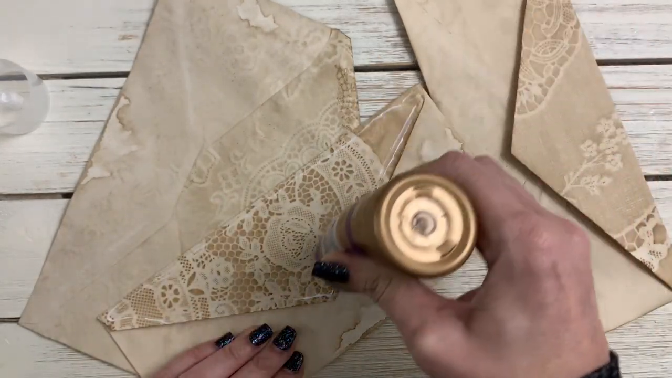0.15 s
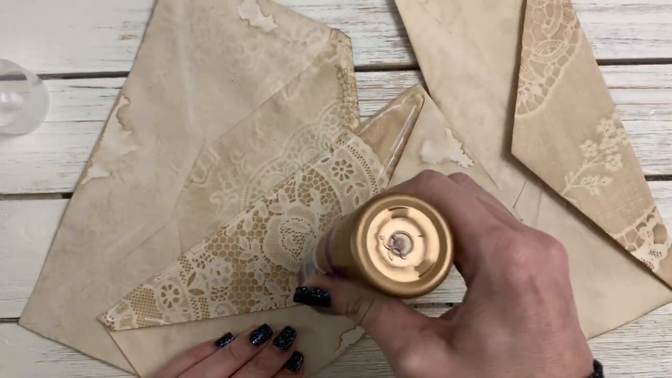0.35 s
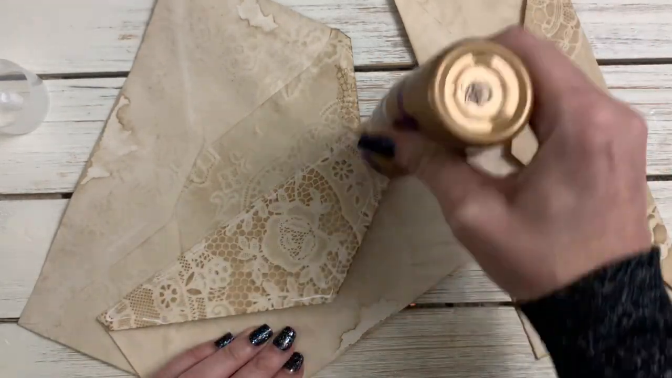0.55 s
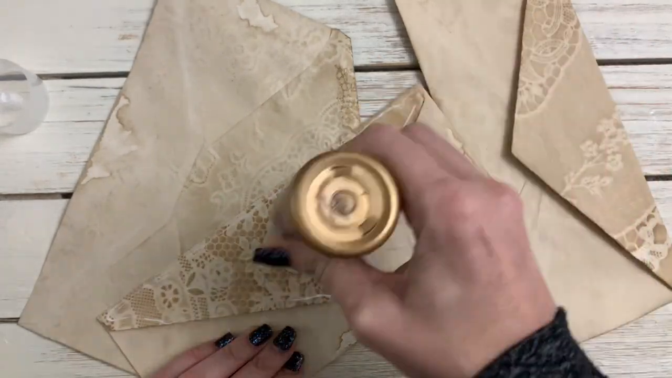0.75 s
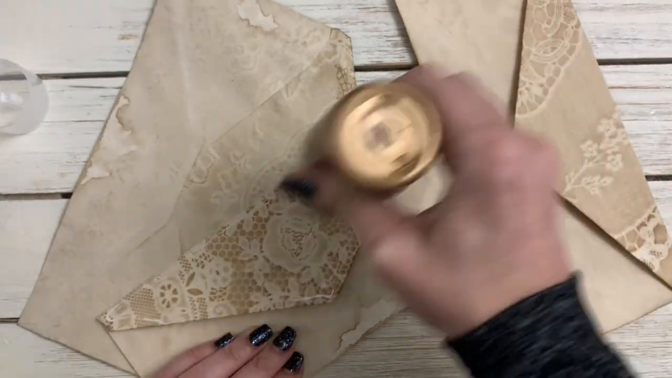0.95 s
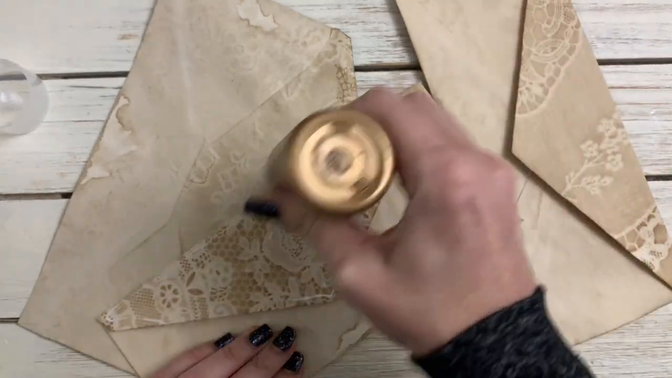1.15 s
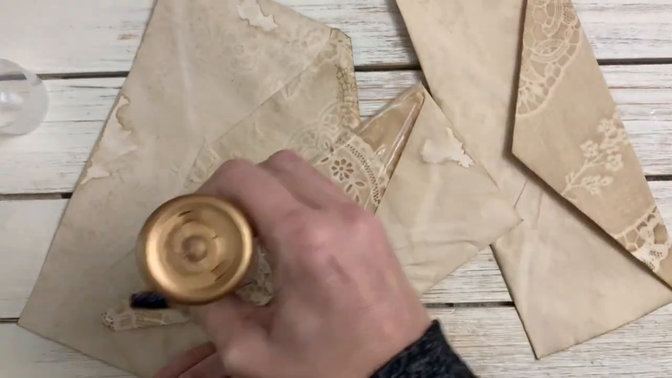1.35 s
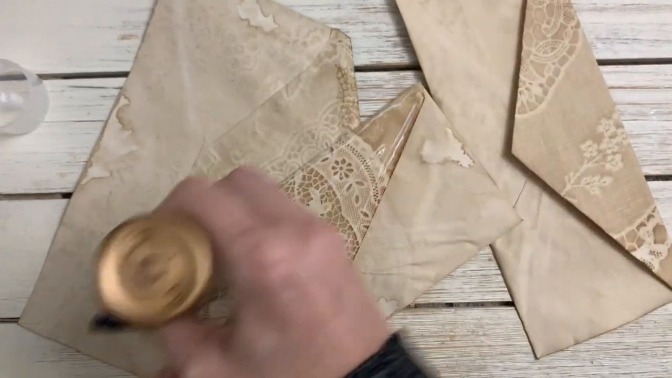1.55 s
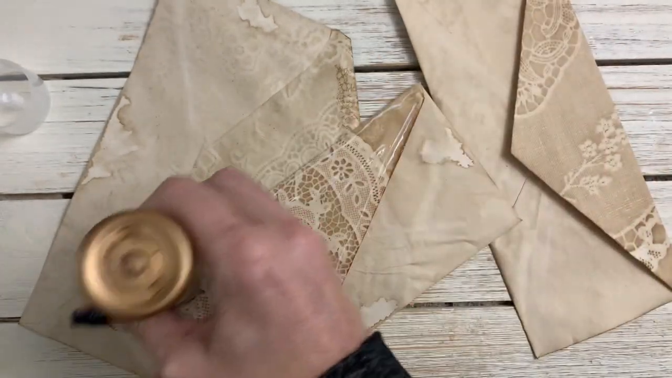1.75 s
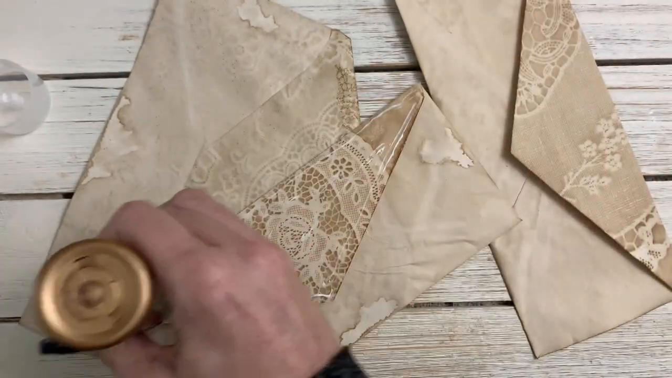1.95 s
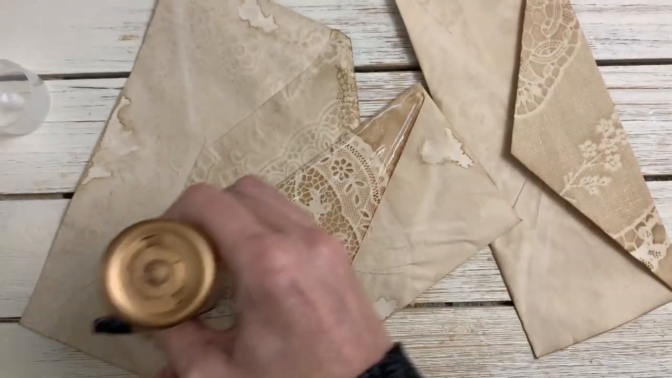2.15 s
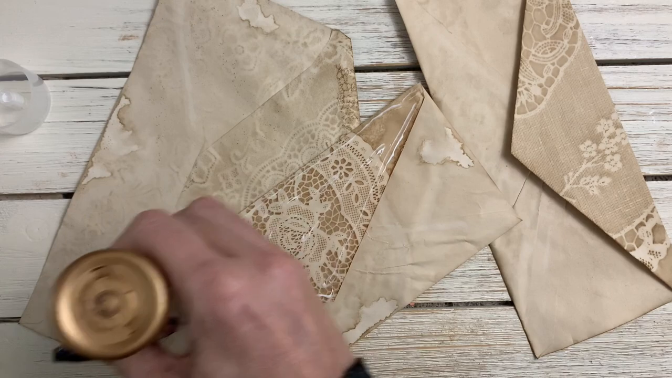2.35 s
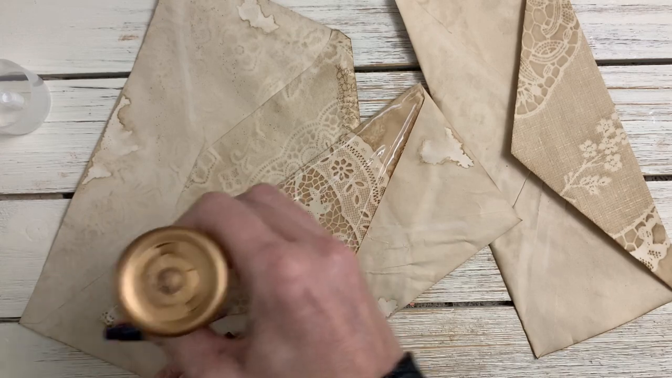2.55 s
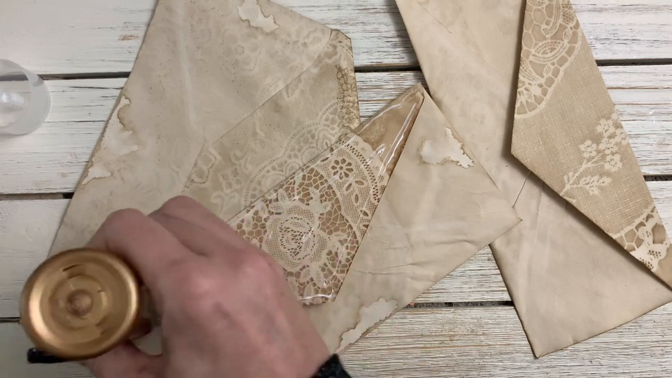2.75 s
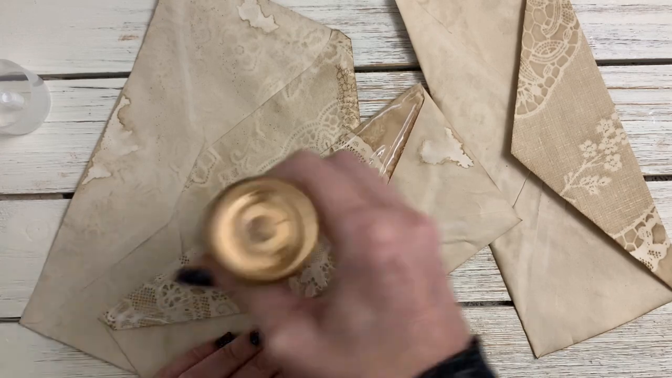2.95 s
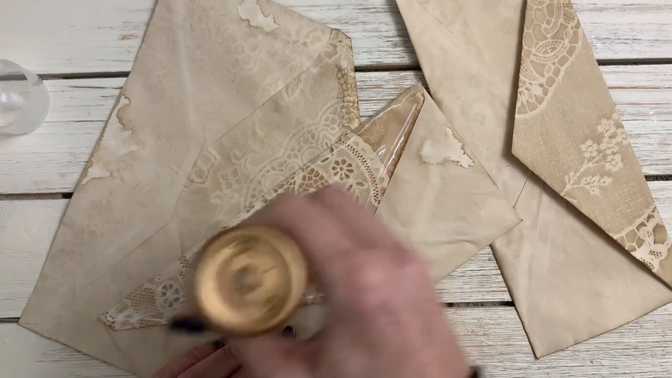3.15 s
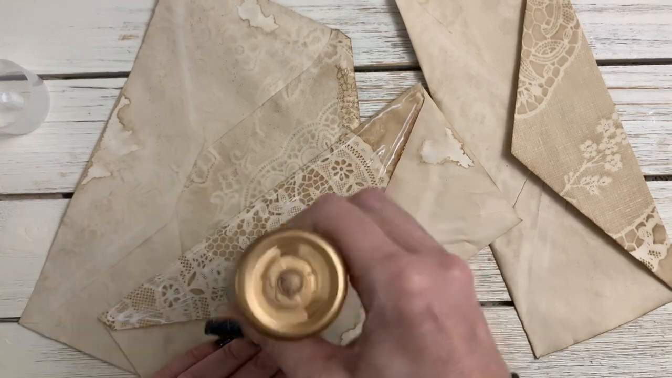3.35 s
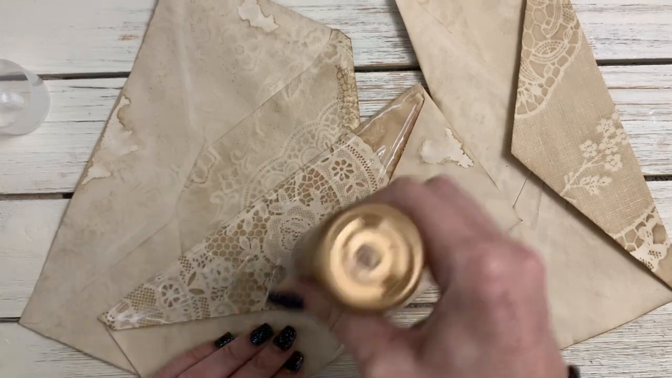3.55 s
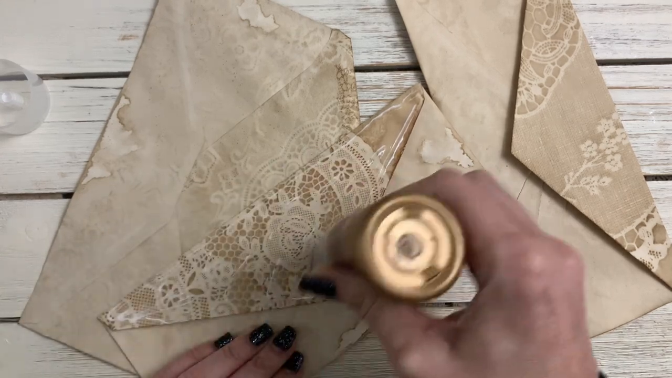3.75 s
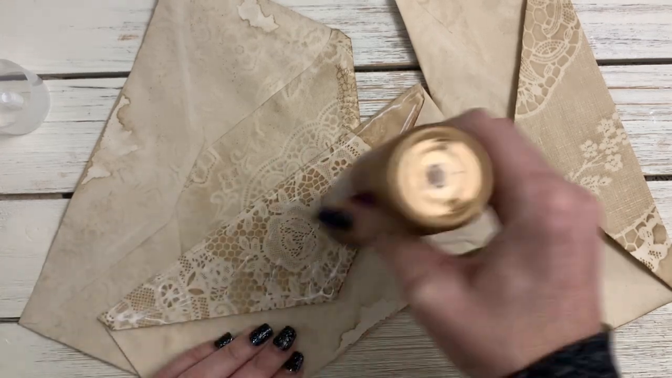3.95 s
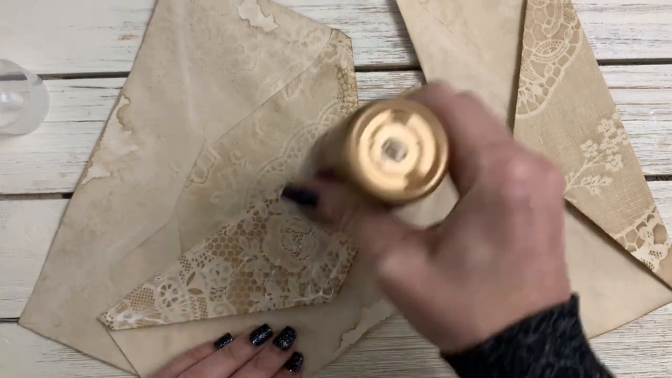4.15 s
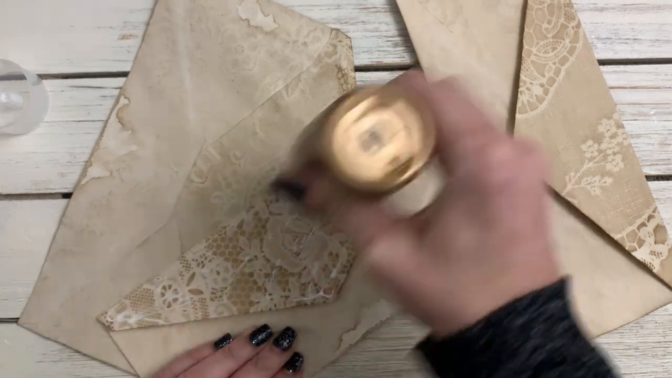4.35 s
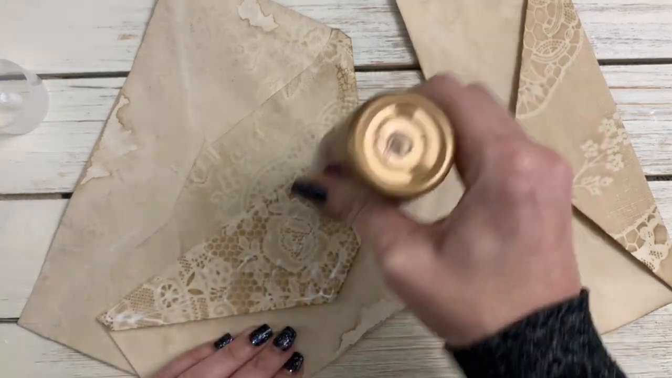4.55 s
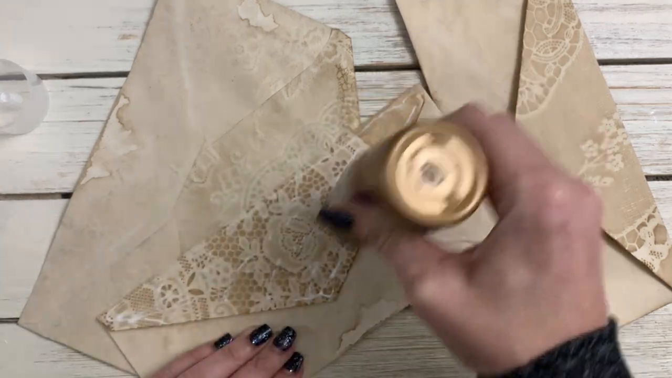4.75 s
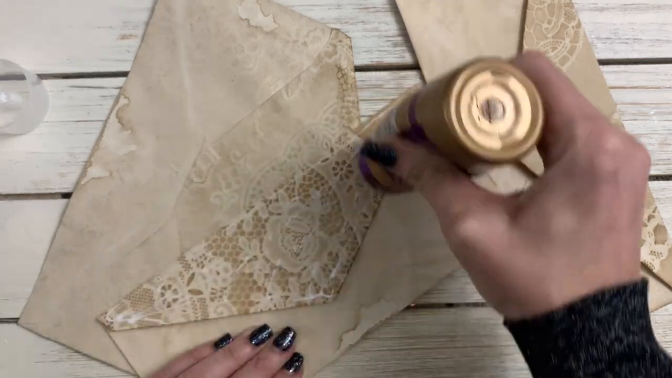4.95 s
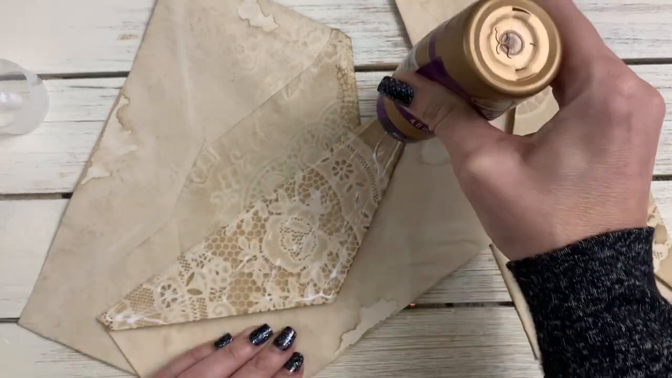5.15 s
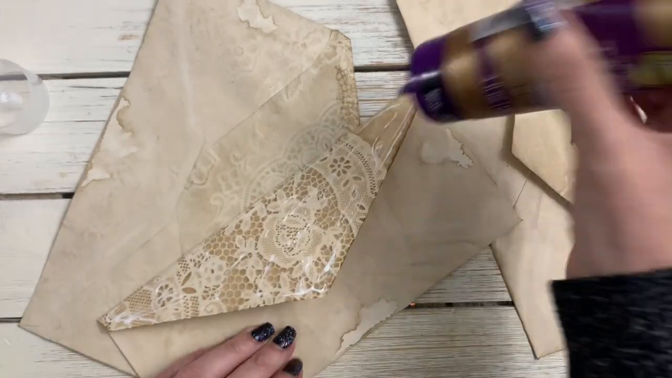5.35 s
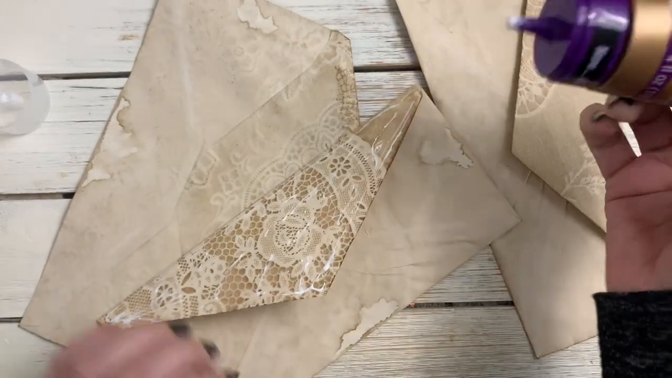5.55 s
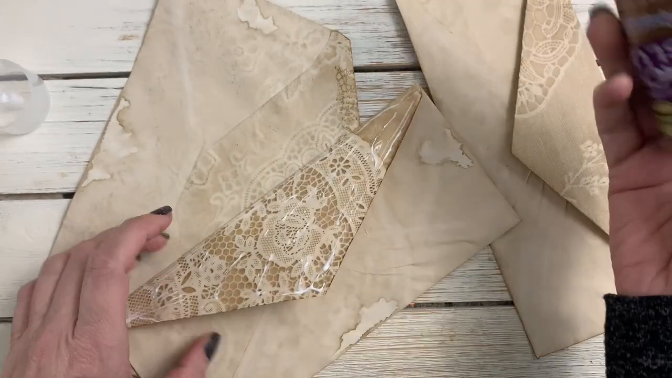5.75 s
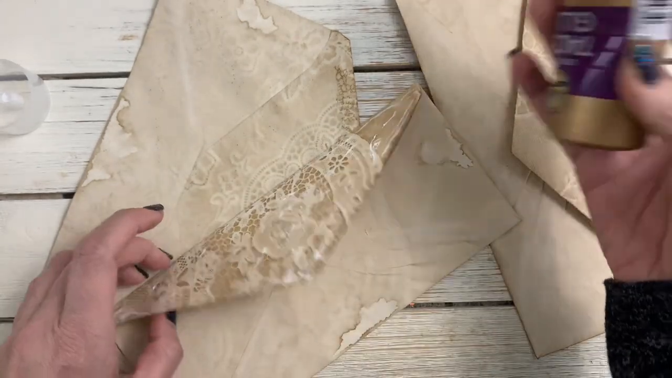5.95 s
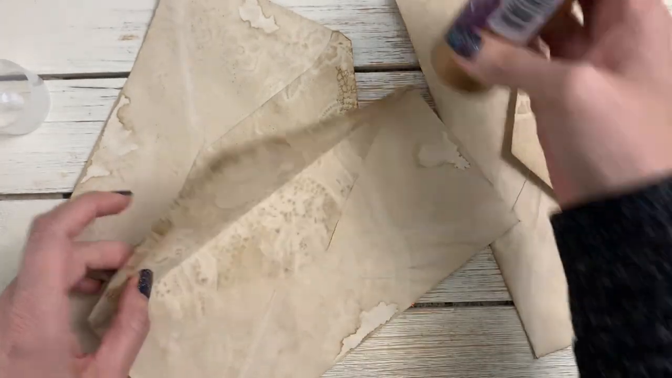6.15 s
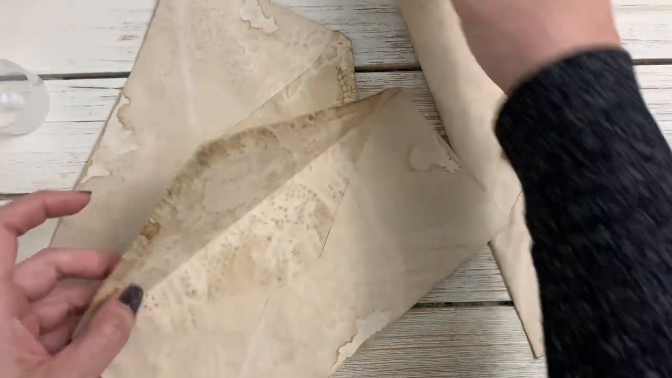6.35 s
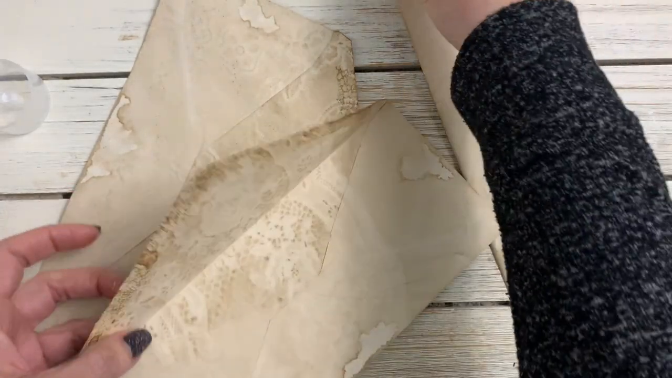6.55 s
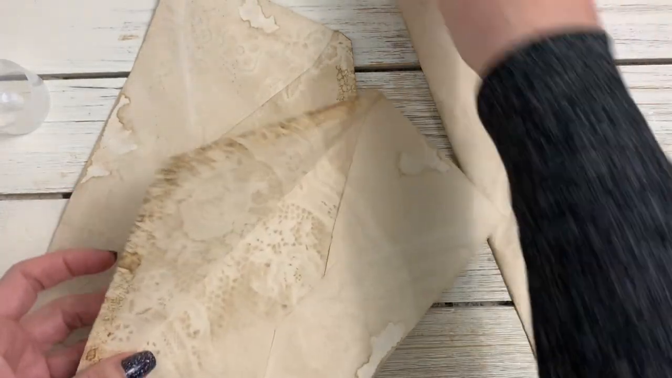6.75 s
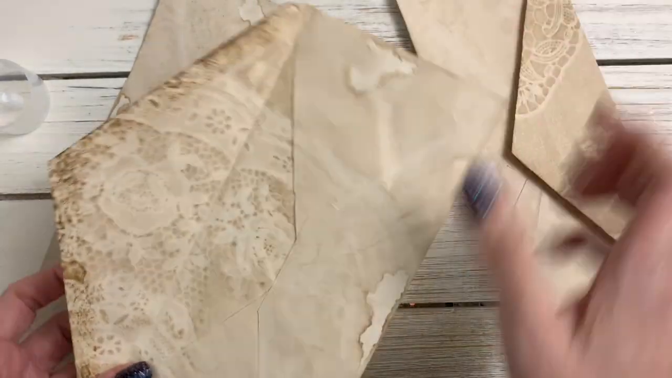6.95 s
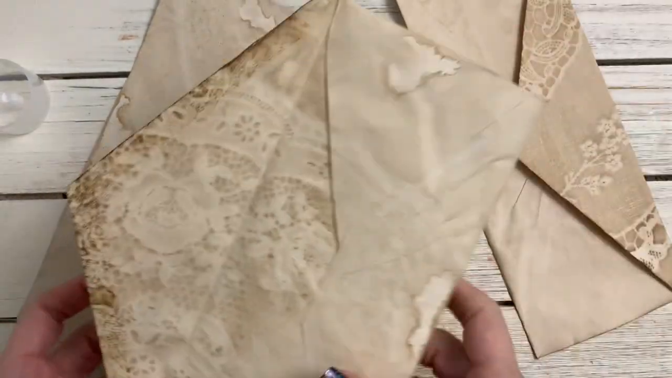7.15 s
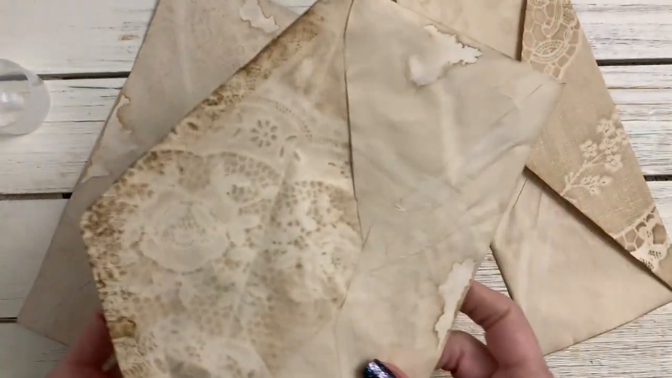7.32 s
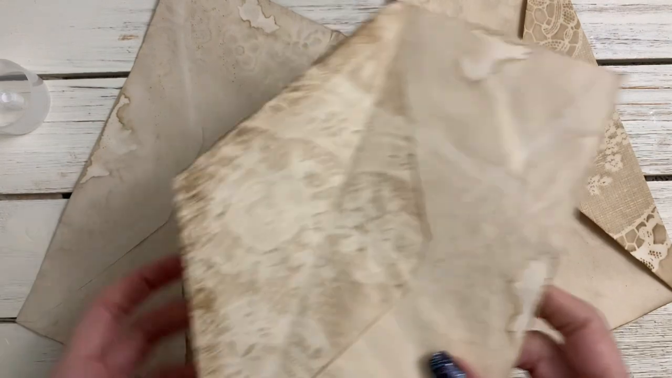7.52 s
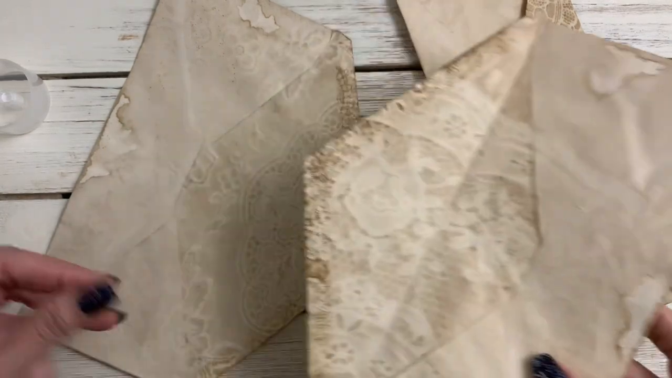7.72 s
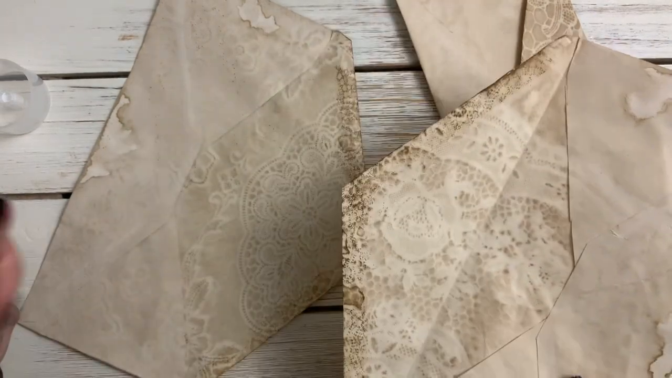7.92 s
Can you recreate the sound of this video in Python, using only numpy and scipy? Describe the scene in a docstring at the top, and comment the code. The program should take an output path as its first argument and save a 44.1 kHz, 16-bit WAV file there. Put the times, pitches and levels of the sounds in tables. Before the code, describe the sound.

From the start until about 5 seconds, the tip of a plastic glue bottle rubs over paper on a wooden table in short, irregular strokes: quiet, dry and scratchy, with small hollow dabs and plastic ticks. Soft bumps on the table come near 1, 2.5 and 4.5 seconds. One sharp, loud plastic click stands out at 3 seconds. Just after 5 seconds there are a few small clicks and a faint sputter of air drawn into the bottle, and the paper begins to rustle softly. At 6.5 seconds the bottle is set down with a loud wooden knock and a brief rattle of loose objects. From about 7.1 to 7.5 seconds fingers and nails tap quickly on the table, picking up the sheet, which slides aside with a light hiss until about 8 seconds. The microphone is a nearby phone in a small room with a faint low rumble.

```python
"""A plastic glue bottle is rubbed and dabbed in short strokes over paper on a wooden table.
Stick-slip friction at the tip scrapes the fibres and drives the bottle's resonances; impacts excite
the table's modes. Air is drawn into the bottle, which is lifted and set down with a rattle; fingers
knock on the table, pick up the paper and slide it aside. A phone close by hears it in a small room."""
import sys
import numpy as np
from scipy import signal
from scipy.fft import rfft, irfft, next_fast_len
from scipy.io import wavfile
from scipy.ndimage import uniform_filter1d, map_coordinates

SR = 44100
rng = np.random.default_rng(int(sys.argv[2]) if len(sys.argv) > 2 else 0)


def inscribe(sig):
    """Save sig as 16-bit PCM at rate SR to the path in sys.argv[1].

    A 1-D sig is mono; a 2-D sig holds one channel per row.
    Samples are clipped to [-1, 1] before scaling.
    """
    pcm = np.round(np.clip(np.atleast_2d(sig).T, -1, 1) * 32767)
    wavfile.write(sys.argv[1], SR, pcm.astype(np.int16))


N = 356328
T = np.arange(N) / SR
TAIL = T[:SR // 2]  # time axis of one impact

# Spectra of the room's rumble, its echoes and their side signal: (frequency [Hz], level [dB])
ROOM_TONE = [(20, -18), (40, 3), (58, 5.5), (85, 4), (125, 3.5), (200, -8.5), (400, -14), (800, -25),
             (1600, -30), (3000, -32.5), (4700, -32), (7000, -36.5), (12000, -28.5), (16000, -31)]
ROOM_ECHO = [(40, 4.5), (300, 5), (900, 2.5), (2000, 6.5), (7000, 4), (10000, 6), (16000, -16)]
ROOM_WIDTH = [(50, -15.5), (300, -7.5), (900, -1.5), (1800, -2), (8000, 5.5), (10000, -4), (16000, -27)]
# Spectra of the indrawn air and of the sheet's rustle and flap: (frequency [Hz], level [dB])
AIR = [(80, 22.5), (200, 12.5), (300, 5.5), (420, 14), (570, 3), (780, 5), (1200, -6.5), (1900, -6),
       (2200, -0.5), (2600, -12.5), (3100, -10.5), (3500, -3.5), (4100, -12.5), (8000, -31)]
RUSTLE = [(600, -68), (1500, -12), (3000, 12.5), (4700, 10), (6500, 8), (9000, 6), (15000, -41)]
FLAP = [(80, -26), (200, -6), (450, -3.5), (800, 0), (1200, -2), (1800, -5), (2700, -6), (3500, -8.5),
        (5500, -23.5)]
# Impact spectra of paper, loose objects and snapping plastic: (frequency [Hz], level [dB])
CRACKLE = [(400, -18), (1200, 6), (2300, 4.5), (4300, -2.5), (6000, -22), (10000, -21.5), (15000, -22.5)]
CLATTER = [(300, -8), (900, -1), (1900, -0.5), (3200, 0), (5000, -2.5), (8000, -7.5), (10500, -8),
           (13500, -6), (15500, -21)]
CRACK = [(600, -8), (2000, -16.5), (3300, -2.5), (6000, -20.5), (10000, 2.5), (14000, -3.5), (16000, -9.5)]
# Friction spectra of the tip, fibres, bottle body and nozzle: (frequency [Hz], level [dB])
SCRAPE = [(700, -29.5), (1400, -17), (2200, -13), (3300, -1.5), (4200, -2.5), (4800, -4), (5500, -5.5),
          (7000, -11.5), (9000, -11.5), (15000, -90)]
HISS = [(3000, -50), (6500, -14), (8500, -3.5), (11300, 2), (13200, 1.5), (15700, -11)]
BODY = [(90, 6), (200, -11), (400, -1), (680, 5), (900, -0.5), (1250, -11.5), (1600, -12.5), (2100, -17),
        (3000, -25.5), (4500, -33.5)]
NOZZLE = [(2000, -28.5), (3000, -20.5), (4300, -5.5), (4800, 0.5), (5050, -7), (5500, -20), (7000, -28)]
# Modes of the table, loose objects and thin plastic: (frequency [Hz], level [dB], T60 [s])
TABLE_MODES = [(47, -11.5, 0.25), (62.05, -6.5, 0.22), (95.5, -15, 0.32), (159.2, -6, 0.16),
               (205.2, -4, 0.13), (298, -6.5, 0.028), (400.5, 6, 0.018), (476, -8, 0.088),
               (583, -11.5, 0.094), (696, -3, 0.024), (1010, -1.5, 0.012)]
RATTLE_MODES = [(1210, -28, 0.27), (1480, -6.5, 0.12), (1780, -11, 0.097), (2149, -12.5, 0.28),
                (2460, -5.5, 0.068), (3200, -22, .08), (3930, -12, 0.11), (4400, -15, 0.12),
                (5200, -7.5, 0.11), (5472, -15.5, 0.14), (6360, -21, .2), (7140, -18.5, 0.11),
                (8930, -21.5, .3)]
PLASTIC_MODES = [(615, 3.5, 0.042), (1015, -5.5, 0.024), (3050, -2, 0.0011), (4620, 5.5, 0.0088),
                 (4600, -6.5, 0.0047), (5640, -1.5, 0.0079), (5900, -18.5, 0.056), (7000, -9, 0.0081),
                 (7200, -12, 0.01)]
# Air drawn into the bottle as the grip eases: (time [s], level [dB])
INTAKE_LEVEL = [(5.16, -66), (5.205, -40.5), (5.31, -50), (5.4, -55.5), (5.55, -60), (5.75, -85)]
# Pushes and lifts of the sheet:
# (start [s], duration [s], rustle level [dB], hiss re rustle [dB], flap re rustle [dB])
SLIDES = [(5.225, 0.13, -60.5, 0.5, 3.5), (5.285, 0.056, -61.5, 7, -11), (5.5, 0.19, -66, 2.5, -6),
          (5.64, 0.063, -57, 7, -1.5), (5.725, 0.099, -48, -3.5, -6), (5.82, .12, -63.5, 1, -5),
          (6.02, 0.079, -59, 3, -2), (6.09, 0.057, -57.5, 4, 3), (6.16, 0.074, -54, -1, -1),
          (6.275, 0.068, -56, 4.5, 3.5), (6.43, 0.3, -57, -3, -1.5), (6.63, 0.07, -64, 5, 3),
          (6.72, 0.23, -68.5, -6, 1.5), (7.112, 0.1, -60.5, 4, 7.5), (7.355, 0.03, -52.5, 2.5, 5.5),
          (7.5, 0.069, -52.5, 3.5, 6.5), (7.57, 0.077, -59, 5.5, 10), (7.665, 0.073, -65, 15.5, -15),
          (7.755, 0.085, -58.5, 6.5, -24), (7.87, 0.26, -65, 15, -20)]
# Reflection of the lifted sheet's sound off the table: (time [s], delay [ms])
SHEET_ECHO = [(5.5, 0.33), (5.8, .35), (6.1, .6), (6.4, .8), (7.5, 0.22), (7.65, .36), (7.75, .44),
              (7.9, .4), (8.07, .35)]
# Soft blows on the table: (time [s], level [dB], contact time [ms], T60 factor [ratio])
KNOCKS = [(0.148, -33, 11.7, 0.55), (.992, -24.5, 4.55, 0.99), (1.464, -32.5, 7.2, 0.68),
          (1.482, -36, 1.75, 0.95), (2.097, -36.5, 11, 1.15), (2.514, -29.5, 8.8, 0.84),
          (4.473, -28.5, 2.66, 0.93), (4.485, -23.5, 13.3, 1.06), (4.76, -33, 6.1, 0.62),
          (4.834, -32.5, 7.8, 0.84), (5.105, -26, 7.3, 1.2), (5.197, -36, 2.1, 0.86),
          (6.499, -19.5, 2.6, 0.67), (6.512, -16.5, 2.65, 1.2), (6.622, -30.5, 7.2, 2.1),
          (6.803, -39.5, 9.9, 1.1), (7.115, -25.5, 3.3, 0.45), (7.149, -28, 1.6, .35), (7.173, -36, 3, .35),
          (7.2132, -27, 1.4, 0.2), (7.309, -35, 1.3, .3), (7.387, -28, 1.05, 0.38), (7.44, -32, 1.3, 0.37)]
# The bottle lands on its rim, then settles on the plank: (time [s], level [dB], frequency [Hz])
THUDS = [(6.5027, -13, 190), (6.5335, -16.5, 61)]
# Hard contacts of the bottle's base, nails and the sheet's edge:
# (time [s], level [dB], starting frequency [Hz], crackle level [dB])
TAPS = [(5.0945, -39, 1500, -36), (6.4972, -10.5, 1395, -17.5), (6.498, -11.5, 800, -36),
        (6.509, -18.5, 1205, -17.5), (7.112, -34, 1310, -30.5), (7.119, -31, 330, -53),
        (7.1303, -25, 1440, -32.5), (7.141, -39, 1670, -47), (7.1523, -20.5, 507, -48),
        (7.1705, -24.5, 1010, -24.5), (7.177, -25, 332, -42), (7.2143, -15.5, 1310, -31),
        (7.2164, -13, 517, -45), (7.246, -26, 1480, -27), (7.306, -30.5, 1020, -53),
        (7.3876, -25, 1080, -31), (7.4408, -26.5, 1230, -42.5), (7.733, -65, 1550, -44)]
# Jolts of loose objects: (time [s], level [dB], emphasised frequency [Hz])
RATTLES = [(1.281, -34, 3430), (5.495, -35, 3000), (6.498, -17.5, 1510), (6.507, -9, 5540),
           (6.5121, -5, 1760), (6.526, -9.5, 4970), (6.534, -12.5, 6000), (6.6196, -11, 2170),
           (6.9147, -28.5, 3550)]
# Snaps of plastic and nails, and crisp ticks of the paper: (time [s], ring level [dB], crack level [dB])
SNAPS = [(.994, -45, -46), (1.978, -51, -61), (2.329, -53, -43), (2.566, -45, -48), (2.893, -24, -44),
         (3.0434, -3, -17), (3.607, -44, -56.5), (3.813, -49, -38.5), (3.906, -44, -36), (4.45, -40, -45),
         (4.753, -51, -52), (5.02, -46.5, -40), (5.096, -33, -24), (5.225, -48, -30.5), (5.297, -52, -19.5),
         (7.111, -41, -26), (7.131, -31, -28.5), (7.214, -37, -42)]
# Touchdowns of the tip: (time [s], level [dB], starting frequency [Hz])
DABS = [(0.593, -46, 1143), (.692, -60, 1100), (.724, -57, 1090), (.846, -35, 829), (.9935, -31, 740),
        (1.2957, -32, 950), (1.405, -40.5, 944), (1.456, -40, 631.5), (1.4826, -36, 840),
        (1.6467, -38, 823), (1.9795, -39.5, 828), (2.0792, -35.5, 741), (2.13, -41, 793),
        (2.452, -47.5, 691), (2.5062, -38, 766), (2.566, -43, 880), (3.119, -42, 792), (3.133, -38.5, 845),
        (3.61, -43, 778), (4.325, -41, 633.4), (4.468, -36, 704.6), (4.542, -45.5, 845), (4.75, -43.5, 650),
        (5.192, -43, 772), (5.208, -50, 644), (5.318, -40, 760)]
# Strokes of the tip: (start [s], duration [s], scrape level [dB], hiss re scrape [dB],
# body re scrape [dB], nozzle re scrape [dB], scrape centre [Hz])
STROKES = [(0.133, 0.029, -59.5, 2, 2.5, 3, 3610), (0.248, 0.061, -71.5, -4, 0.5, 6.5, 4314),
           (0.36, 0.079, -51.5, -0.5, 0, 0, 4290), (0.419, 0.034, -44.5, 10, -23, -18, 4290),
           (0.446, 0.04, -40.5, 9.5, -17, -23, 4560), (0.483, 0.035, -40, 1, -15.5, -24, 4110),
           (0.568, 0.031, -54.5, -5, -18, -13, 3994), (0.605, 0.025, -41.5, 1, -15.5, -21, 3744),
           (0.765, 0.042, -48, 0.5, -13.5, -8, 4430), (0.805, 0.051, -43.5, 4.5, -8.5, -17, 4404),
           (0.944, 0.034, -57, 0, 2, 0, 3790), (0.979, 0.027, -46.5, -6.5, 6, -1.5, 3825),
           (1.062, 0.088, -51, -1, -3.5, -7.5, 4010), (1.146, 0.13, -59.5, -8, 1.5, -2, 3865),
           (1.27, 0.019, -43.5, -13, -7, -4, 3396), (1.377, 0.036, -54.0, -4.5, -9, -4, 3880),
           (1.44, 0.064, -59.5, -11, 3, 0.5, 3505), (1.598, 0.08, -66.5, 3.5, 1.5, 0.5, 3680),
           (1.73, 0.079, -64, -3, 6, 2.5, 3235), (1.887, 0.046, -63.5, 3.5, 2, -5, 4630),
           (1.968, 0.01, -63.5, 0, 7, 9, 4020), (2.022, 0.032, -59.5, 0, 3, -2, 4300),
           (2.403, 0.064, -64, -4, -2, -1, 3500), (2.508, 0.051, -54.5, -12.5, -2, -8, 2605),
           (2.865, 0.026, -49, 4, -6.5, -0.5, 4557), (2.891, 0.035, -39.5, -1.5, -11, -0.5, 4190),
           (2.995, 0.05, -58, -11.5, -8, 0.5, 4233), (3.035, 0.045, -40, -11.5, -13, -20, 5194),
           (3.107, 0.041, -50, 0, 0, -14, 4423), (3.151, 0.036, -43.5, 5, -14, -2.5, 4000),
           (3.189, 0.045, -58.5, -0.5, -18, -8, 4000), (3.379, 0.064, -50.5, 1.5, -7, -2.5, 4360),
           (3.597, 0.031, -51.5, -0.5, 6, -1.5, 3840), (3.645, 0.02, -62, 3.5, 6.5, -5.5, 3946),
           (3.814, 0.028, -59.5, 3, 2, -23, 4010), (4.058, 0.053, -44, -0.5, -13.5, -11, 3980),
           (4.314, 0.074, -42.5, -1, -12, -15.5, 4096), (4.448, 0.047, -51, 0, 7.5, -2, 4060),
           (4.566, 0.018, -55, -4.5, -25, -3, 3636), (4.617, 0.043, -50, -1, -10.5, -14, 3916),
           (4.723, 0.046, -66, -4, 9, 8, 3636), (4.81, 0.019, -52.5, -2, -1.5, 0, 4720),
           (4.845, 0.027, -49, 0, 7.5, -3, 4414), (5.051, 0.052, -45, -5, -15, -14, 4100)]
# Lead of the left microphone port over the right: (frequency [Hz], phase [rad])
PORT_PHASE = [(0, 0), (1400, .5), (2700, 2.4), (3600, 2.7), (4300, 4), (5400, 4.3), (6700, 7), (7300, 7),
              (8400, 3.4), (10100, 0), (11800, -3.1), (13300, -6.2), (13700, -6.3), (15000, -9.4)]
# Gain of the left port over the right: (frequency [Hz], level [dB])
PORT_BALANCE = [(100, -0.5), (500, 1.1), (1000, 2.3), (2000, 2.5), (4500, -1), (8000, -2.5), (12000, 0)]


def amp(db):
    """Amplitude ratio of a level in decibels."""
    return 10 ** (np.asarray(db) / 20)


def unit(x):
    """Normalisation to unit rms."""
    return x / np.sqrt(np.mean(x ** 2))


def peak(x, db):
    """Normalisation to a peak level."""
    return x * amp(db) / np.abs(x).max()


def curve(points):
    """Linear interpolation of (time, value) points."""
    return np.interp(T, *np.transpose(points))


def add(track, s, sound):
    """Superposition of a sound on a track at time s."""
    i = int(s * SR)
    track[i:i + len(sound)] += sound[:N - i]


def colour(x, spectrum):
    """Zero-phase filtering by (frequency, level) points."""
    hz, db = np.transpose(spectrum)
    bin_hz = np.fft.rfftfreq(len(x), 1 / SR) + 1
    return irfft(rfft(x) * amp(np.interp(np.log(bin_hz), np.log(hz), db)), len(x))


def noise(spectrum, size=N):
    """Filtered Gaussian noise of unit rms."""
    return unit(colour(rng.standard_normal(next_fast_len(size, True)), spectrum)[:size])


def wander(rate_hz):
    """Smooth random modulation of unit rms."""
    hold = int(SR / rate_hz)
    steps = np.repeat(rng.standard_normal(N // hold + 1), hold)
    return unit(uniform_filter1d(steps, hold)[:N])


def fade(t60, t=TAIL):
    """Exponential decay by 60 dB in t60 seconds."""
    return np.exp(-np.log(1000) * t / t60)


def ring(modes, lag_cycles):
    """Damped modes with plate dispersion: the slower low waves arrive later."""
    out = 0
    for hz, db, t60 in modes:
        t = np.maximum(TAIL - lag_cycles / hz, 0)
        polarity = -1 if hz < 55 else 1  # the deepest mode opposes its neighbour, so a thud swells
        out = out + polarity * amp(db) * np.sin(2 * np.pi * hz * t) * fade(t60, t)
    return out


def tock(hz, t60, sag, sag_s, rise_s):
    """A heavily damped oscillator; its frequency falls by the fraction sag as the contact settles."""
    cycles = hz * ((1 - sag) * TAIL + sag * sag_s * (1 - np.exp(-TAIL / sag_s)))
    return np.sin(2 * np.pi * cycles) * (1 - np.exp(-TAIL / rise_s)) * fade(t60)


def friction(spectrum, slips_per_s, spread_db, flutter_db):
    """Stick-slip friction: random, uneven impulses, filtered by what they shake, flutter in level."""
    size = next_fast_len(N, True)
    slips = (rng.random(size) < slips_per_s / SR) * rng.standard_normal(size)
    slips *= amp(spread_db * np.minimum(rng.exponential(size=size), 5))
    return unit(colour(slips, spectrum)[:N] * amp(flutter_db * wander(170)))


def movements(table, attack_share, release_share, edge_s):
    """One envelope per layer: amplitude follows sliding speed, and overlapping moves add in power."""
    power = np.zeros((len(table[0]) - 2, N))
    for start, length, db, *relative_db in table:
        near = slice(max(int((start - .15) * SR), 0), int((start + length + .3) * SR))
        since = T[near] - start
        attack = (1 + np.tanh(since / (edge_s + attack_share * length))) / 2
        release = (1 + np.tanh((length - since) / (edge_s + release_share * length))) / 2
        gains = amp(db + np.array([0, *relative_db]))
        power[:, near] += (gains[:, None] * attack * release) ** 2
    return np.sqrt(power)


def shifting(x, depth_db, patch_hz, patch_s, size=256):
    """Spectral modulation: patches swell and sink independently, as when a contact meets new fibres."""
    spectrum = signal.stft(x, nperseg=size)[2]
    patches = rng.standard_normal(spectrum.shape)
    for axis, steps in enumerate([patch_hz * size / SR, patch_s * SR * 2 / size]):
        patches = uniform_filter1d(patches, round(steps), axis=axis)
    gain = amp(depth_db * np.tanh(unit(patches) / 2))
    return signal.istft(spectrum * gain, nperseg=size)[1][:N]


def reflections(t60, after_s, db):
    """Impulse response of a diffuse field: dense echoes that decay exponentially."""
    echo = rng.standard_normal(len(TAIL)) * fade(t60) * (TAIL > after_s)
    return colour(amp(db) * echo / np.linalg.norm(echo), ROOM_ECHO)


def room(x, poses=22):
    """Reverberation over a steady rumble, as mid and side; early echoes shift as the hands move."""
    fields, hop = [], N / poses
    for _ in range(2):
        wet = signal.fftconvolve(x, reflections(t60=0.24, after_s=0.0095, db=-19))[:N]
        for k in range(poses + 1):
            a, b = max(int((k - 1) * hop), 0), min(int((k + 1) * hop), N)
            crossfade = np.cos(np.pi / 2 * (np.arange(a, b) / hop - k))
            early = reflections(t60=0.027, after_s=0.0005, db=-8)
            add(wet, a / SR, signal.fftconvolve(x[a:b] * crossfade, early))
        fields.append(wet + amp(-60) * noise(ROOM_TONE))
    return x + fields[0], colour(fields[1], ROOM_WIDTH)


def air_intake(sputter_db=2.5):
    """Intermittent flow: air sputters through the gluey nozzle and excites the bottle's cavity."""
    air = friction(AIR, slips_per_s=760, spread_db=1, flutter_db=-1.5) * amp(sputter_db * wander(45))
    return amp(curve(INTAKE_LEVEL)) * unit(shifting(air, depth_db=7, patch_hz=500, patch_s=.025))


def table_reflection(x, strength=0.27):
    """Comb filtering by an inverted echo: the notches glide as the gap under the sheet changes."""
    delayed = map_coordinates(x, [(T - curve(SHEET_ECHO) / 1000) * SR], mode="nearest")
    return unit(x - strength * delayed)


def paper_slides(level_db=-1, drag_db=2.3):
    """Sliding friction with uneven drag: the sheet rustles, its edge hisses and its face flaps."""
    envelopes = movements(SLIDES, attack_share=0.13, release_share=0.24, edge_s=0.01)
    rustle, hiss, flap = envelopes * amp(level_db + drag_db * wander(30))
    rustle *= table_reflection(friction(RUSTLE, slips_per_s=16000, spread_db=3, flutter_db=0.5))
    hiss *= friction(HISS, slips_per_s=12000, spread_db=1, flutter_db=1)
    flap *= friction(FLAP, slips_per_s=9900, spread_db=0.5, flutter_db=0.5)
    return shifting(rustle + hiss + flap, depth_db=6, patch_hz=700, patch_s=.025)


def table_knocks(spot_db=1):
    """Modal response to a force pulse: the shorter the contact, the higher the modes it reaches."""
    out = np.zeros(N)
    for s, db, contact_ms, t60_factor in KNOCKS:
        # each spot has its own mix of modes; the pressing hand sets their damping
        modes = [(hz, mode_db + spot_db * rng.standard_normal(), t60 * t60_factor)
                 for hz, mode_db, t60 in TABLE_MODES]
        force = np.sin(np.pi * np.minimum(TAIL * 1000 / contact_ms, 1)) ** 2
        response = signal.fftconvolve(force, ring(modes, lag_cycles=0.82))[:len(TAIL)]
        add(out, s, peak(response, db))
    return out


def plank_thuds():
    """A loaded plate: the plank's deep note swells for one cycle and is damped by the bottle."""
    out = np.zeros(N)
    for s, db, hz in THUDS:
        cycles = TAIL * hz
        add(out, s, peak(np.sin(2 * np.pi * cycles) * cycles ** 2 * np.exp(-2 * cycles), db))
    return out


def hard_taps(shake_db=-14, crackle_spread_db=4):
    """Heavily damped impacts: a dead knock drops in pitch while the sheet shakes and crackles."""
    out, size = np.zeros(N), len(TAIL)
    for s, db, hz, crackle_db in TAPS:
        knock = tock(hz, t60=0.0095, sag=.7, sag_s=.0035, rise_s=.0005)
        shake_spectrum = [(hz / 8, -8), (hz / 3, 1), (hz * 0.87, 0), (hz * 1.66, -22), (hz * 7, -50)]
        shake = noise(shake_spectrum, size) * fade(t60=0.036)
        spikes = rng.standard_normal(size) * amp(crackle_spread_db * rng.standard_normal(size))
        crackle = colour(spikes, CRACKLE) * fade(t60=0.02)
        add(out, s, peak(knock + amp(shake_db) * shake, db) + peak(crackle, crackle_db))
    return out


def rattles(ring_db=-27, scatter_db=3, focus_db=9):
    """Free vibration of jolted hard objects: a pitched crack, then the same modes in a new mix."""
    out = np.zeros(N)
    for s, db, hz in RATTLES:
        modes = [(mode_hz, mode_db + scatter_db * rng.standard_normal(), t60)
                 for mode_hz, mode_db, t60 in RATTLE_MODES]
        emphasis = [(hz / 0.78, 0), (hz, focus_db), (hz * 1.1, 0)]
        crack = unit(colour(noise(CLATTER, len(TAIL)), emphasis)) * fade(t60=0.011)
        add(out, s, peak(crack + amp(ring_db) * ring(modes, lag_cycles=2.9), db))
    return out


def plastic_snaps(radiates_above_hz=3000):
    """A small radiator gives little bass: thin plastic rings briefly under a dry crack."""
    out = np.zeros(N)
    radiation = signal.butter(2, radiates_above_hz, "high", fs=SR, output="sos")
    plastic = signal.sosfilt(radiation, ring(PLASTIC_MODES, lag_cycles=1.5))
    for s, ring_db, crack_db in SNAPS:
        crack = noise(CRACK, len(TAIL)) * fade(t60=0.01)
        add(out, s, peak(plastic, ring_db) + peak(crack, crack_db))
    return out


def bottle_dabs(t60=0.0299, lower_ratio=0.58, lower_db=-7, rasp_db=-12):
    """Impact excitation: the tip touches down on the paper and the hand-damped bottle rings hollowly."""
    out = np.zeros(N)
    for s, db, hz in DABS:
        upper = tock(hz, t60, sag=0.093, sag_s=.005, rise_s=0.00052)
        lower = tock(hz * lower_ratio, t60, sag=0.14, sag_s=0.0074, rise_s=0.0019)
        rasp = noise(BODY, len(TAIL)) * fade(t60=0.1)
        add(out, s, peak(upper + amp(lower_db) * lower + amp(rasp_db) * rasp, db))
    return out


def tip_scrape(reference_hz=4200):
    """Roughness noise: the faster the tip crosses the fibres, the higher its spectrum lies."""
    grit = friction(SCRAPE, slips_per_s=4500, spread_db=2.8, flutter_db=2)
    centre_hz = curve([(start + length / 2, hz) for start, length, *_, hz in STROKES])
    position = np.cumsum(centre_hz / reference_hz) % (N - 1)
    return unit(map_coordinates(grit, [position]))


def bottle_rubbing():
    """Friction-driven vibration: the tip scrapes, the fibres hiss, and nozzle and body rasp."""
    strokes = [row[:-1] for row in STROKES]
    scrape, hiss, body, nozzle = movements(strokes, attack_share=0.14, release_share=0.24, edge_s=0.0054)
    scrape *= amp(-3) * tip_scrape()
    hiss *= amp(-2) * friction(HISS, slips_per_s=6600, spread_db=0.9, flutter_db=3.5)
    nozzle *= amp(-0.5) * friction(NOZZLE, slips_per_s=6100, spread_db=0.5, flutter_db=3.5)
    body *= amp(1) * friction(BODY, slips_per_s=1000, spread_db=-1.5, flutter_db=-0.5)
    return shifting(scrape + hiss + nozzle + body, depth_db=6, patch_hz=700, patch_s=.014)


def scene(sources_db=-1, snap_send_db=-11):
    """Superposition of all sources in the room; the snaps are nearest, so mostly direct sound."""
    snaps, send = plastic_snaps(), amp(snap_send_db)
    sources = (bottle_rubbing() + bottle_dabs() + table_knocks() + plank_thuds()
               + hard_taps() + rattles() + paper_slides() + air_intake())
    mid, side = room(amp(sources_db) * sources + send * snaps)
    mid += (1 - send) * snaps
    return np.array([mid + side, mid - side])


def record(dry, low_cut_hz=42, top_hz=15800):
    """Phase and level differences between the phone's two ports, followed by band limiting."""
    size = next_fast_len(N + SR // 10, True)
    hz = np.fft.rfftfreq(size, 1 / SR)
    sides = np.array([[.5], [-.5]])
    lead = np.interp(hz, *np.transpose(PORT_PHASE))
    balance_db = np.interp(hz, *np.transpose(PORT_BALANCE))
    response = np.exp(1j * sides * lead) * amp(sides * balance_db)
    ports = irfft(rfft(dry, size) * response, size)[:, :N]
    ports = signal.sosfilt(signal.butter(4, low_cut_hz, "high", fs=SR, output="sos"), ports)
    return signal.sosfilt(signal.ellip(8, .2, 70, top_hz, fs=SR, output="sos"), ports)


dry = scene()
out = record(dry)
inscribe(out)
```